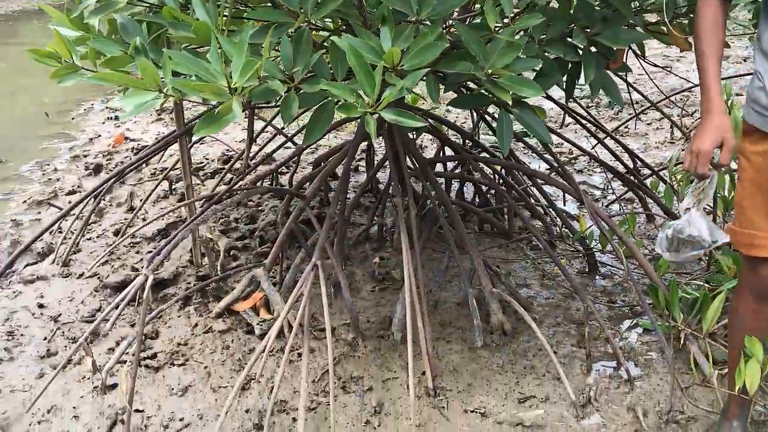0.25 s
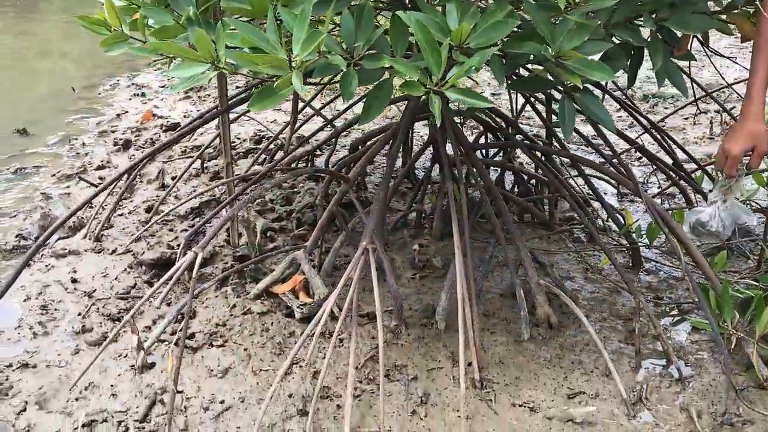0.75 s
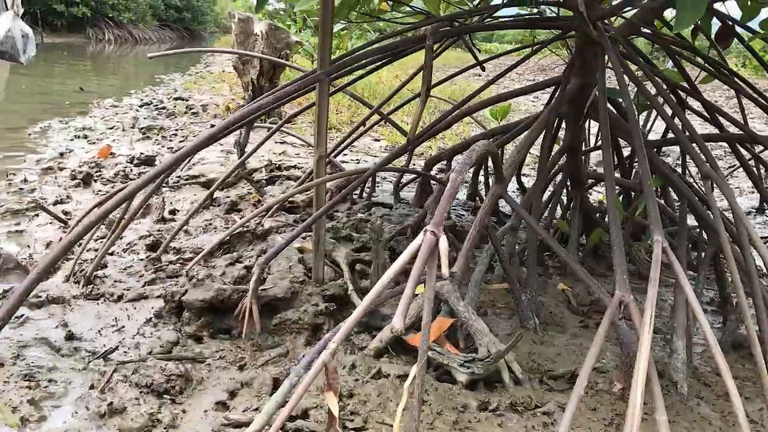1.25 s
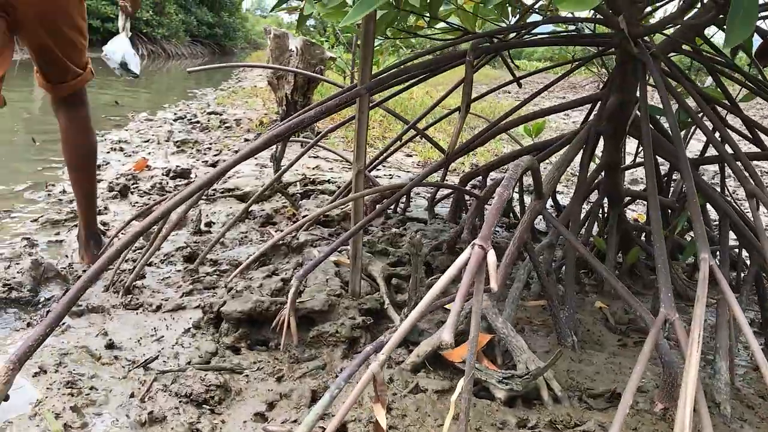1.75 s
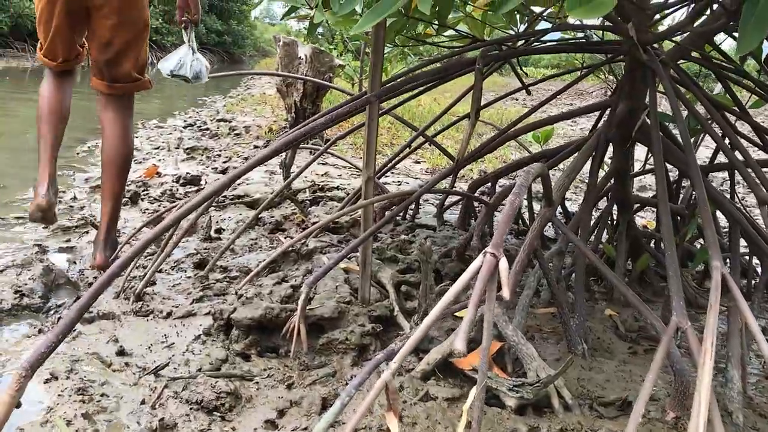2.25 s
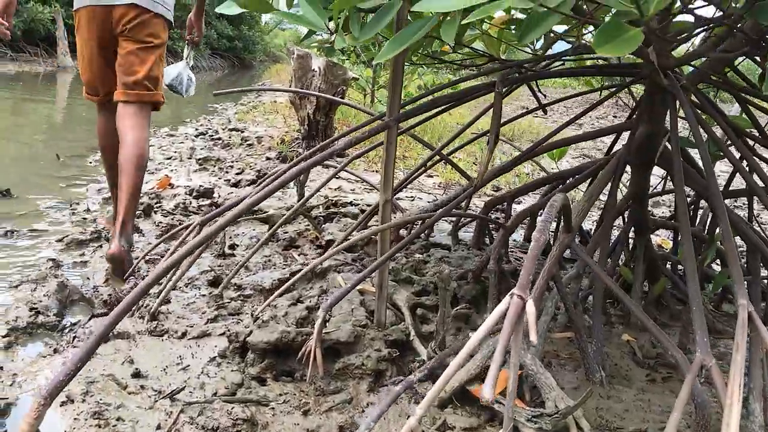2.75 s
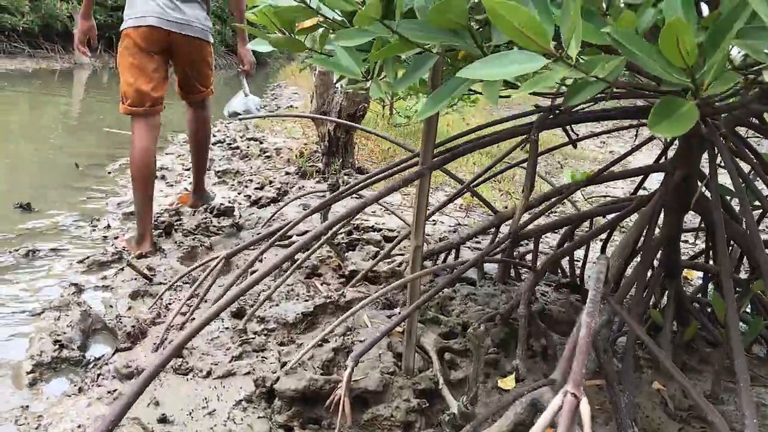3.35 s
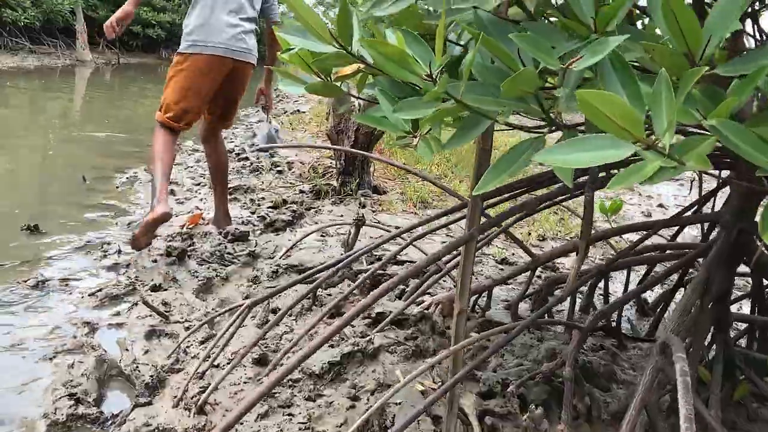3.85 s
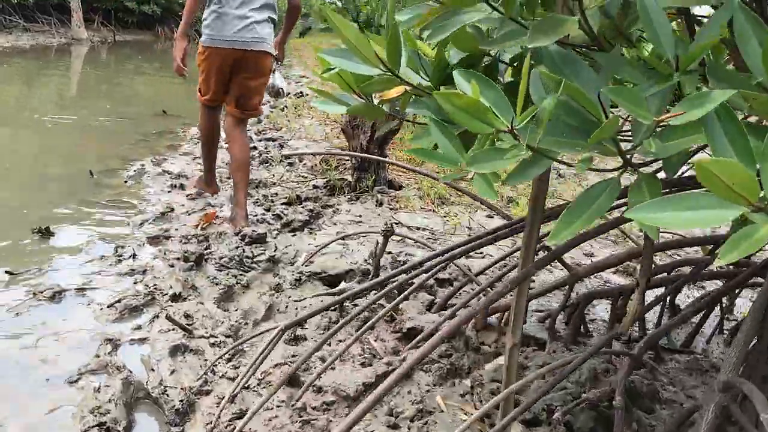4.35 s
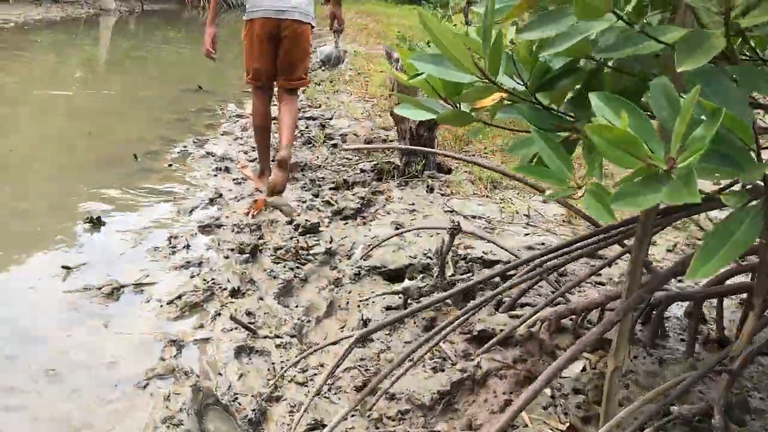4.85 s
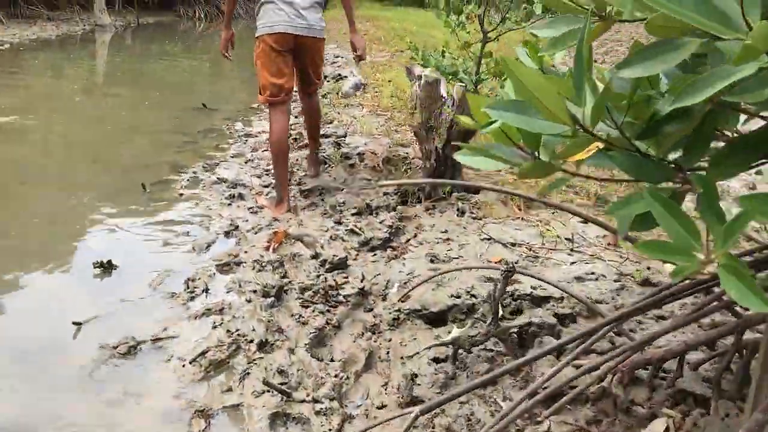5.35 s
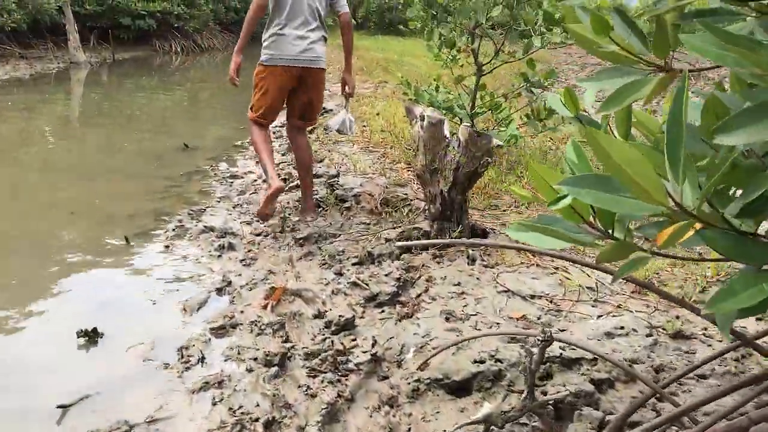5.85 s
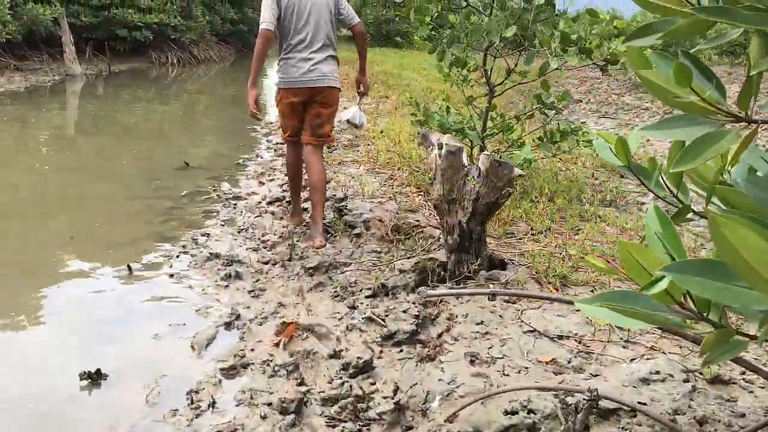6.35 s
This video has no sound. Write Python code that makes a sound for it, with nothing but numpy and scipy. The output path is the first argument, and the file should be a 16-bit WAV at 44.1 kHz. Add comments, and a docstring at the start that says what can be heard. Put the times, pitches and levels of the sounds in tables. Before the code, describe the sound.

Bare feet squelch and pop through wet creek mud over a distant throbbing boat engine, faint insect buzz and late wind bumps.

```python
"""A soft squeeze of mud and small pops are heard first: bare feet squelch on a wet creek bank.
Mud is dense showers of ringing bubbles, single bursts and plops as decaying sines, and sliding cavity tones.
Far off, a boat engine throbs as a sum of harmonics over a low rumble, hiss and air of shaped noise.
Insects buzz as narrow-band noise, pitched just below a thin high whine; late on, wind nudges the
microphone in low swells. The level dips briefly before the first second is over, and returns abruptly."""
import sys
import numpy as np
from scipy import signal
from scipy.fft import rfft, irfft
from scipy.io import wavfile
from scipy.ndimage import uniform_filter1d

SR = 44100
rng = np.random.default_rng(int(sys.argv[2]) if len(sys.argv) > 2 else 0)


def log_audio(samples):
    """Write samples as a 16-bit WAV file to the path given in sys.argv[1]."""
    # one column per channel
    frames = np.atleast_2d(samples).T
    # limit to full scale, then quantise
    limited = np.clip(frames, -1, 1)
    pcm = np.round(limited * 32767).astype(np.int16)
    wavfile.write(sys.argv[1], SR, pcm)


N = 290927
TIME = np.arange(N) / SR   # seconds

# All levels below are those before the output gain.
# Background noise. Each row: time in seconds, then rumble, distant hiss and air levels in dB.
BACKGROUND_LEVELS = [(0, -55.5, -73.5, -73), (.8, -54.5, -79.5, -76.5), (.87, -50, -64.5, -68),
                     (1.6, -52.5, -68, -74), (2.3, -55, -66.5, -73), (4.3, -54, -66, -76.5),
                     (4.9, -57, -62, -75), (5.8, -55.5, -65.5, -70.5), (6.6, -55.5, -71, -75)]
# Noise spectra, each rescaled to rms 1. Each row: frequency in Hz, relative density in dB.
RUMBLE_SPECTRUM = [(30, -18), (40, -5.5), (65, -5.5), (110, -1), (170, -8), (260, -12.5), (400, -24),
                   (600, -28), (1000, -36.5)]
HISS_SPECTRUM = [(240, 5.5), (400, 8.5), (488, -10), (635, -2), (1400, 0.5), (1520, -1), (1890, -4),
                 (3500, -11), (4550, -17), (7700, -120)]
AIR_SPECTRUM = [(2000, -73), (2600, -7.5), (7500, -6.5), (8600, -6.5), (10300, -11.5), (12000, -7),
                (15000, -6.5), (15400, -26)]
# Resonances in the hiss. Each row: centre in Hz, width of one pass in Hz, level in dB relative to the hiss.
HISS_RESONANCES = [(1005, 48, -13), (1730, 500, -9.5)]
HISS_WAVER_DB, RESONANCE_WAVER_DB = 1.2, 2.5

# Bouts of the near insect. Each row: start in seconds, end in seconds, level in dB.
BUZZ_BOUTS = [(0.405, 0.832, -74), (1.47, 1.703, -73.5), (2.232, 2.62, -72.5), (3.002, 3.566, -77),
              (3.81, 4.47, -75.5), (4.87, 5.604, -73.5), (5.914, 6.462, -73)]
BUZZ_HZ, BUZZ_WIDTH_HZ = 8796, 65   # width of one pass through the resonance
CHORUS_HZ, CHORUS_WIDTH_HZ, CHORUS_DB = 8560, 300, -77.5
# Fundamental of the whine, itself silent. Each row: start in seconds, pitch in Hz.
WHINE_PITCHES = [(0, 1884), (.84, 1831.5), (1.1, 1860), (2.63, 1840), (3.65, 1871.5), (4.6, 1882.5)]
# Audible harmonics of the whine. Each row: multiple of the fundamental, peak level in dB.
WHINE_HARMONICS = [(5, -85), (7, -81), (8, -82)]
WHINE_SLIDE_S = 0.05

# Gusts on the microphone. Each row: centre in seconds, envelope peak in dB, pitch in Hz,
# length in seconds between the points where the envelope is exp(-2) of its peak.
WIND_GUSTS = [(5.638, -36, 79.5, 0.018), (5.938, -35.5, 71.6, 0.029), (6.024, -43, 79, 0.011),
              (6.136, -36.5, 61, 0.039), (6.176, -40.5, 59.7, 0.11), (6.27, -46.5, 91.5, 0.062),
              (6.464, -39, 74, 0.022), (6.584, -47, 75, 0.027)]

# Engine loudness. Each row: time in seconds, level in dB.
ENGINE_LEVELS = [(0, -62.5), (.8, -59.5), (.87, -49), (2.5, -50), (4.3, -53), (5.3, -52), (5.9, -57),
                 (6.6, -57.5)]
# Engine firing rate. Each row: time in seconds, firings per second.
FIRING_RATES = [(0, 36.2), (.87, 36.1), (2.5, 36.3), (4.3, 36.5), (5.4, 36.85), (6.6, 37.4)]
# Exhaust harmonics. Each row: multiple of the firing rate, relative level in dB.
EXHAUST_HARMONICS = [(2, 0.5), (3, -4), (4, -4), (5, -5.5), (6, -8.5), (7, -16.5), (8, -16.5), (9, -20),
                     (10, -15.5), (12, -28)]

SEEP_DB = -81
# Dull plops in wet footprints. Each row: start in seconds, peak level in dB, pitch in Hz.
FOOTPRINT_PLOPS = [(1.035, -49.5, 560), (4.758, -44.5, 530), (5.492, -46, 400), (5.517, -46, 430),
                   (5.662, -46.5, 390), (5.739, -47.5, 385), (5.856, -51, 370), (5.92, -53, 400)]
PLOP_SWELL_S, PLOP_T60_S = 0.0021, 0.012

# Sucks of a foot pulling free. Each row: start in seconds, starting level in dB, start pitch in Hz,
# target pitch in Hz (the slide overshoots it by half), time in seconds to fall 60 dB.
FOOT_SUCKS = [(1.915, -43.5, 1185, 1240, 0.048), (5.278, -35.5, 205, 348, 0.2),
              (5.281, -47.5, 3680, 2530, 0.07), (5.995, -42.5, 276, 312, 0.045)]
SUCK_WOBBLE_DB = 3

# Mud squeezed under a foot. Each row: peak time in seconds, rise in seconds, fall in seconds,
# then peak levels in dB of the large bubbles, small bubbles and fizz.
MUD_SQUEEZES = [(0.001, .01, 0.018, -58, -62, -72), (0.06, .05, 0.12, -66.5, -66.5, -74),
                (0.478, 0.017, 0.016, -90, -71, -63), (0.966, 0.0019, 0.025, -51, -50, -79),
                (1.293, 0.01, 0.03, -42.5, -45, -67), (1.384, 0.076, 0.054, -49.5, -50, -51),
                (1.43, 0.028, 0.35, -61.5, -66, -81), (1.704, .004, 0.33, -96, -74, -65),
                (1.796, 0.047, 0.038, -68, -58.5, -70), (1.903, 0.064, 0.11, -66.5, -61, -73),
                (2.107, 0.017, 0.11, -61, -55, -62), (2.591, 0.0094, 0.018, -85, -65.5, -80),
                (2.842, 0.034, 0.032, -72, -60, -66), (3.697, 0.014, 0.044, -58.5, -55, -59),
                (4.408, 0.038, 0.15, -48, -53, -60), (4.513, 0.022, 0.073, -64, -58.5, -75),
                (4.587, 0.053, 0.11, -58, -59.5, -63.5), (4.69, 0.26, 0.16, -98, -64.5, -68.5),
                (4.816, 0.13, 0.11, -62, -72, -65.5), (5.03, 0.017, 0.49, -66.5, -65.5, -76),
                (5.234, 0.076, 0.0086, -58, -61, -69), (5.28, 0.03, 0.045, -45.5, -48.5, -53),
                (5.345, 0.041, 0.057, -52, -57.5, -63), (5.39, 0.26, 0.033, -64.5, -63, -68),
                (5.43, 0.027, 0.16, -64, -72, -82), (5.84, 0.15, 0.046, -64.5, -68, -66.5),
                (6.499, 0.025, 0.025, -60.5, -48, -44), (6.59, 0.15, .05, -67, -66.5, -65.5)]
SQUEEZE_SPAN_DB = 20   # gained over the rise and lost over the fall
CLUMP_DB = 3.0         # spread of the chance swings in bubble level

# Bursting air pockets. Each row: start in seconds, tone level in dB, starting pitch in Hz,
# cycles to fall 60 dB, crack level in dB before its noise is band-passed.
AIR_POCKET_POPS = [(0.04, -48, 2200, 16, -63), (0.063, -44, 4540, 26, -57), (0.135, -59, 3860, 51, -62),
                   (0.193, -52.5, 1350, 31, -63), (0.243, -55, 4800, 20, -57),
                   (0.387, -50.5, 1430, 18, -55), (0.705, -62, 4020, 23, -66), (0.967, -40, 4180, 10, -36),
                   (1.076, -51, 4050, 17, -56), (1.283, -24.5, 1235, 9.4, -43),
                   (1.295, -20, 772, 17, -40.5), (1.318, -43.5, 785, 37, -66),
                   (1.333, -47, 3020, 130, -41.5), (1.336, -48, 1100, 28, -60),
                   (1.364, -43.5, 1155, 40, -58), (1.377, -39.5, 940, 30, -60),
                   (1.376, -38.5, 1630, 31, -55), (1.384, -45, 2660, 60, -60), (1.393, -38, 5530, 21, -53),
                   (1.422, -48.5, 2850, 60, -65), (1.451, -55, 4070, 30, -62), (1.468, -37, 2270, 6.8, -55),
                   (1.477, -45, 3080, 61, -51), (1.489, -48.5, 2740, 70, -49), (1.497, -50, 2800, 32, -44),
                   (1.709, -42.5, 4260, 23, -42.5), (1.755, -51.5, 1700, 26, -46),
                   (1.766, -42.5, 3800, 9.1, -44), (1.789, -44, 2380, 9.7, -63),
                   (1.876, -47, 3020, 14.0, -45), (1.879, -41.5, 6500, 25, -57),
                   (1.905, -46, 1270, 20, -60), (1.897, -46, 2920, 30, -44), (1.942, -47, 4350, 20, -62),
                   (1.951, -44, 6500, 24, -49), (2.028, -53, 2800, 20, -58), (2.096, -43, 1026, 49, -61),
                   (2.114, -40.5, 1220, 22, -64), (2.156, -36.5, 5400, 20, -48),
                   (2.171, -51, 1840, 30, -65), (2.243, -49.5, 1100, 22, -63), (2.629, -62, 714, 16, -46.5),
                   (2.795, -54.5, 3380, 30, -68), (2.829, -40.5, 6630, 12, -49),
                   (3.687, -46, 3530, 13, -53), (3.837, -49, 3500, 7.3, -53), (3.874, -38.5, 5600, 12, -46),
                   (3.906, -57, 3800, 16, -56), (4.043, -50, 1410, 15, -71), (4.149, -52, 2170, 17, -75),
                   (4.359, -51, 2550, 32, -63), (4.375, -47, 1500, 14, -52), (4.397, -39.5, 1340, 21, -48),
                   (4.405, -39.5, 819, 30, -51), (4.407, -49, 2000, 40, -60), (4.422, -39, 1530, 25, -62),
                   (4.478, -43.5, 1640, 100, -67), (4.477, -48, 1140, 61, -65),
                   (4.511, -41.5, 3900, 13, -67), (4.585, -37, 1620, 16, -64), (4.604, -45, 2350, 20, -60),
                   (4.614, -48, 3550, 20, -59), (4.708, -52, 4800, 20, -64), (4.786, -45.5, 3600, 20, -48),
                   (5.013, -46, 2880, 20, -47), (5.031, -39.5, 4400, 8.8, -45),
                   (5.048, -45.5, 1230, 13, -50), (5.152, -46, 1520, 32, -62), (5.163, -43, 1490, 9.5, -49),
                   (5.168, -41, 1085, 32, -50), (5.186, -49, 4000, 20, -63), (5.202, -43, 5100, 30, -45),
                   (5.213, -40.5, 2780, 28, -55), (5.246, -49, 940, 50, -54), (5.274, -45, 820, 6, -37),
                   (5.276, -32.5, 4430, 56, -58), (5.283, -39.5, 1730, 14, -46),
                   (5.299, -38.5, 2050, 23, -62), (5.341, -39, 1550, 34, -55),
                   (5.347, -42.5, 5300, 41, -54), (5.352, -45, 1310, 18, -55), (5.373, -41, 5700, 13, -46),
                   (5.398, -43, 5700, 17, -47), (5.419, -48, 1230, 28, -70), (5.455, -61, 2000, 9.7, -51),
                   (5.483, -46.5, 3760, 14, -57), (5.601, -54, 1320, 15, -47.5)]
POP_SWELL_CYCLES, POP_SWELL_S = 0.96, 0.00017   # the swell's time constant is their sum
POP_PHASE_GAIN_PER_CYCLE = 0.00037              # the pitch itself rises by twice this share
OVERTONE_RATIO, OVERTONE_DB, OVERTONE_CYCLES = 2.2, -13.5, 25   # cycles of the pop's pitch to fall 60 dB
CRACK_T60_S = 0.022
NEIGHBOUR_LAG_S, NEIGHBOUR_SPREAD = 0.0025, 0.3   # 1-2 lags later, at most this share off pitch
NEIGHBOUR_DB, NEIGHBOUR_TOP_DB = -6, -36          # relative to its pop, whose level is capped here

DIP_START_S, DIP_FADE_S, DIP_END_S, DIP_DB = 0.8054, 0.013, 0.86, -40
OUTPUT_GAIN_DB = 2.3
CUTOFF_HZ = 15800   # the stop band begins 500 Hz higher


def amp(db):
    """Decibels express the logarithm of an amplitude ratio; this inverts it."""
    return 10 ** (np.asarray(db) / 20)


def rms_one(x):
    """Mean square measures power; the signal is scaled to rms 1."""
    return x / np.sqrt(np.mean(x ** 2) + 1e-20)


def in_time(rows):
    """Linear interpolation turns the columns of a timed table into continuous curves."""
    s, *columns = np.transpose(rows)
    return [np.interp(TIME, s, c) for c in columns]


def drift(rate_hz):
    """White noise through two equal low-pass poles at rate_hz wanders slowly, with rms 1."""
    step = 40   # samples between computed points
    r = np.exp(-2 * np.pi * rate_hz * step / SR)
    settle = 2000
    noise = rng.standard_normal(N // step + settle + 2)
    slow = signal.lfilter([1], [1, -2 * r, r * r], noise)[settle:]
    return np.interp(np.arange(N) / step, np.arange(len(slow)), rms_one(slow))


def coloured(spectrum):
    """Multiplying the spectrum of white noise by a gain curve colours it; rms 1."""
    hz, level_db = np.transpose(spectrum)
    grid = np.fft.rfftfreq(N, 1 / SR) + 1   # the offset keeps the logarithm finite
    gain = amp(np.interp(np.log(grid), np.log(hz), level_db, left=-90, right=-90))
    return rms_one(irfft(rfft(rng.standard_normal(N)) * gain, N))


def ring(clicks, hz, t60):
    """A damped resonator answers a unit impulse with a sine that falls 60 dB in t60 seconds."""
    r = amp(-60 / (t60 * SR))
    w = 2 * np.pi * hz / SR
    return signal.lfilter([0, np.sin(w)], [1, -2 * r * np.cos(w), r * r], clicks + 1e-18)


def narrow_noise(hz, width_hz):
    """Damping sets the bandwidth of a resonance; noise passes through it twice, rms 1."""
    t60 = np.log(1000) / np.pi / width_hz
    once = ring(rng.standard_normal(N), hz, t60)
    return rms_one(ring(once, hz, t60))


def grains(per_s, low_hz, high_hz, cycles, spread_db, tilt, count=14):
    """Random impulses excite resonators: each bubble swells and dies over a few cycles; rms 1."""
    sizes = amp(spread_db * np.minimum(rng.exponential(1, N), 4)) * rng.choice([-1, 1], N)
    born = sizes * (rng.random(N) < per_s / SR)
    pitch_index = rng.integers(0, count, N)
    total = np.zeros(N)
    for k, hz in enumerate(np.geomspace(low_hz, high_hz, count)):
        # two rings in a row give the soft start
        once = ring(born * (pitch_index == k), hz, cycles / hz)
        twice = ring(once, hz, cycles / hz)
        # the tilt keeps the quick small bubbles from vanishing
        total += hz ** tilt * twice
    return rms_one(total)


def surroundings():
    """Broadband noise with distinct spectra gives rumble, distant resonant hiss and bright air."""
    rumble_db, hiss_db, air_db = in_time(BACKGROUND_LEVELS)
    rumble = amp(rumble_db + 1.5 * drift(8)) * coloured(RUMBLE_SPECTRUM)
    resonances = np.zeros(N)
    for hz, width_hz, db in HISS_RESONANCES:
        resonances += amp(db + RESONANCE_WAVER_DB * drift(4.3)) * narrow_noise(hz, width_hz)
    hiss_gain = amp(hiss_db + HISS_WAVER_DB * drift(3.4))
    hiss = hiss_gain * (coloured(HISS_SPECTRUM) + resonances)
    air = amp(air_db + 1.0 * drift(25)) * coloured(AIR_SPECTRUM)
    return rumble + hiss + air


def insects():
    """Narrow-band noise makes a buzzer in bouts and a steady chorus; harmonics make a thin whine."""
    bouts = np.zeros(N)
    for start, end, db in BUZZ_BOUTS:
        bouts += amp(db) * ((TIME > start) & (TIME < end))
    # 900 samples of averaging soften the edges of each bout
    buzz = uniform_filter1d(bouts, size=900) * narrow_noise(BUZZ_HZ, BUZZ_WIDTH_HZ)
    chorus = amp(CHORUS_DB) * narrow_noise(CHORUS_HZ, CHORUS_WIDTH_HZ)

    starts, pitches = np.transpose(WHINE_PITCHES)
    held = pitches[np.searchsorted(starts, TIME, "right") - 1]
    gliding = uniform_filter1d(held, size=round(WHINE_SLIDE_S * SR), mode="nearest")
    turns = np.cumsum(gliding) / SR + 0.05 * drift(12)
    whine = np.zeros(N)
    for k, db in WHINE_HARMONICS:
        whine += amp(db + 2.4 * drift(36.0)) * np.sin(2 * np.pi * k * turns)
    return buzz + chorus + whine


def wind():
    """Moving air displaces the membrane: each gust is a low sine under a Gaussian envelope."""
    out = np.zeros(N)
    for s, db, hz, length in WIND_GUSTS:
        t = TIME - s
        out += amp(db) * np.exp(-8 * (t / length) ** 2) * np.sin(2 * np.pi * hz * t)
    return out


def engine():
    """Harmonics in phase sum to one thump a firing; chance varies its strength and timing."""
    turns = np.cumsum(in_time(FIRING_RATES)[0]) / SR + 0.012 * drift(9.9)
    thumps = np.zeros(N)
    for k, db in EXHAUST_HARMONICS:
        thumps += amp(db) * np.cos(2 * np.pi * round(k) * turns)
    return amp(in_time(ENGINE_LEVELS)[0] + 0.5 * drift(12)) * rms_one(thumps)


def seep():
    """Sparse random excitation: small bubbles burst now and then as the wet bank ticks by itself."""
    bubbles = grains(90, 2300, 7000, cycles=16.0, spread_db=2.0, tilt=1.1)
    return amp(SEEP_DB + 1.7 * drift(5)) * bubbles


def plops():
    """A water-filled hollow is a strongly damped resonator: a soft click sets it ringing."""
    out = np.zeros(N)
    for s, peak_db, hz in FOOTPRINT_PLOPS:
        t = np.clip(TIME - s, 0, 1)
        shape = amp(-60 * t / PLOP_T60_S) * (1 - np.exp(-t / PLOP_SWELL_S))
        out += amp(peak_db) * shape / shape.max() * np.sin(2 * np.pi * hz * t)
    return out


def sucks():
    """The resonance of a closing cavity shifts with its shape: a dying, unsteady, sliding tone."""
    out, wobble = np.zeros(N), drift(170)
    for s, peak_db, start_hz, target_hz, t60 in FOOT_SUCKS:
        t = np.clip(TIME - s, 0, 1)
        slide = np.minimum(t / (0.243 * t60), 1.5)
        hz = start_hz + (target_hz - start_hz) * slide
        turns = np.cumsum(hz * (t > 0)) / SR
        level_db = peak_db - 60 * (t / t60) ** 1.18 + SUCK_WOBBLE_DB * wobble
        out += amp(level_db) * np.sin(2 * np.pi * turns)
    return out


def squelch():
    """Smaller bubbles ring higher: large, small and tiny ones follow each squeeze in clumps."""
    levels = np.zeros((3, N))
    for s, rise, fall, *peaks_db in MUD_SQUEEZES:
        before = (s - TIME) / max(rise, 0.001)
        after = (TIME - s) / max(fall, 0.001)
        away = np.where(TIME < s, before, after)
        levels += np.outer(amp(peaks_db), amp(-SQUEEZE_SPAN_DB * away))
    large = grains(700, 587, 2040, cycles=12.0, spread_db=3.0, tilt=2.16)
    large *= amp(CLUMP_DB * drift(62))
    small = grains(1800, 2260, 6370, cycles=19.0, spread_db=1.0, tilt=1.0, count=18)
    small *= amp(CLUMP_DB * drift(70))
    tiny = grains(5000, 6500, 18600, cycles=4.5, spread_db=3.5, tilt=0.95)
    tiny *= amp(CLUMP_DB * drift(35))
    return np.sum(levels * [large, small, tiny], axis=0)


def pops():
    """A bursting air pocket rings as a damped, rising tone with a noise crack and a smaller neighbour."""
    length, count = 3000, len(AIR_POCKET_POPS)   # samples given to each burst
    out, t = np.zeros(N + length), np.arange(length) / SR
    band = signal.butter(1, [2500, 9000], "band", fs=SR, output="sos")
    puffs = signal.sosfilt(band, rng.standard_normal((count, length)))
    chances = rng.random((count, 2))
    for (s, peak_db, hz, cycles, crack_db), puff, (late, off) in zip(AIR_POCKET_POPS, puffs, chances):
        turns = hz * t
        swell = 1 - np.exp(-turns / (POP_SWELL_CYCLES + hz * POP_SWELL_S))
        shape = amp(-60 * turns / max(cycles, 2)) * swell
        shape /= shape.max()
        tone = shape * np.sin(2 * np.pi * turns * (1 + POP_PHASE_GAIN_PER_CYCLE * turns))
        overtone_gain = amp(OVERTONE_DB - 60 * turns / OVERTONE_CYCLES)
        tone += overtone_gain * np.sin(2 * np.pi * OVERTONE_RATIO * turns)
        crack = amp(crack_db - 60 * t / CRACK_T60_S) * puff
        i = round(s * SR)
        out[i:i + length] += amp(peak_db) * tone + crack

        i += round((1 + late) * NEIGHBOUR_LAG_S * SR)
        near_turns = turns * (1 + NEIGHBOUR_SPREAD * (2 * off - 1))
        near_gain = amp(min(peak_db, NEIGHBOUR_TOP_DB) + NEIGHBOUR_DB)
        out[i:i + length] += near_gain * shape * np.sin(2 * np.pi * near_turns)
    return out[:N]


def scene():
    """By superposition the pressures of all sources add, here in one channel."""
    background = surroundings() + insects() + wind() + engine()
    mud = seep() + plops() + sucks() + squelch() + pops()
    return (background + mud)[None]


def record(dry):
    """Gain scales every source alike, with one brief dip; a low-pass filter removes the top."""
    faded = np.clip((TIME - DIP_START_S) / DIP_FADE_S, 0, 1) * (TIME < DIP_END_S)
    levelled = dry * amp(OUTPUT_GAIN_DB + DIP_DB * faded)
    low_pass = signal.cheby2(12, 70, CUTOFF_HZ + 500, fs=SR, output="sos")
    return signal.sosfilt(low_pass, levelled)


dry = scene()
out = record(dry)
log_audio(out)
```